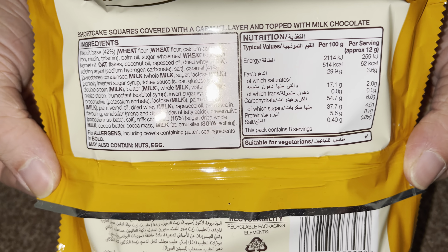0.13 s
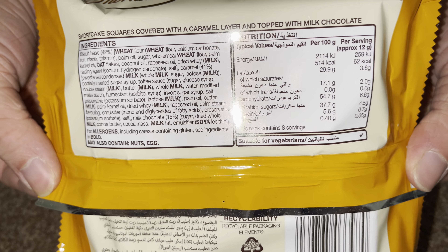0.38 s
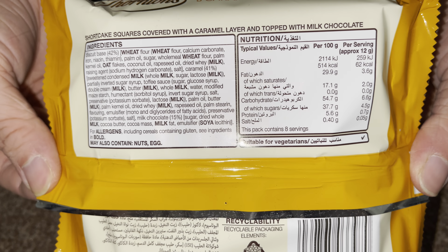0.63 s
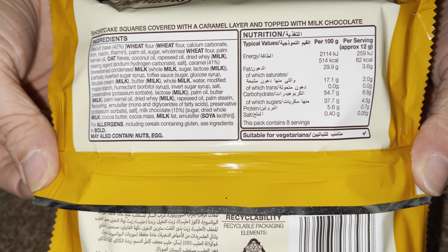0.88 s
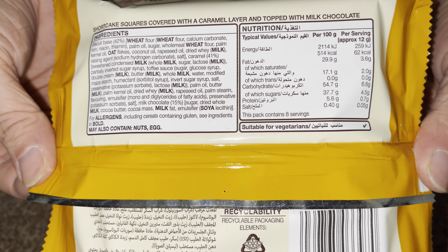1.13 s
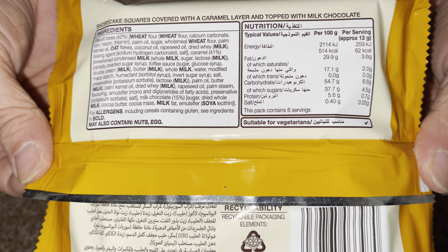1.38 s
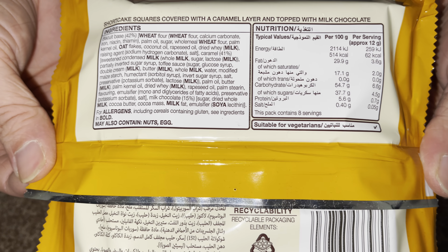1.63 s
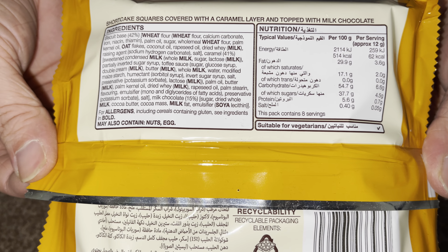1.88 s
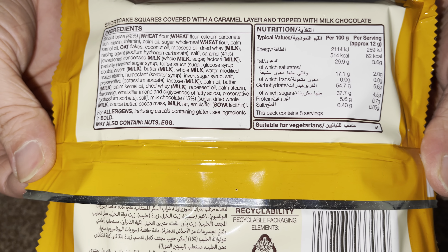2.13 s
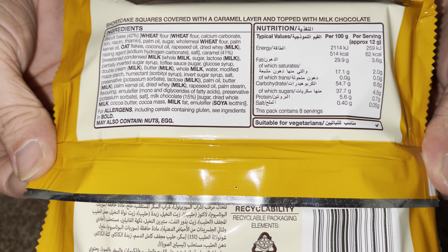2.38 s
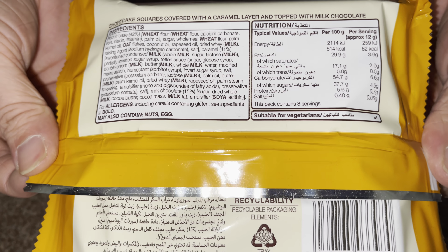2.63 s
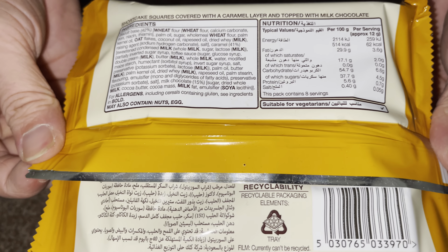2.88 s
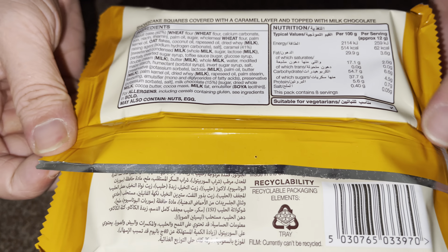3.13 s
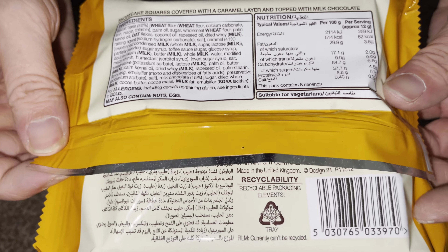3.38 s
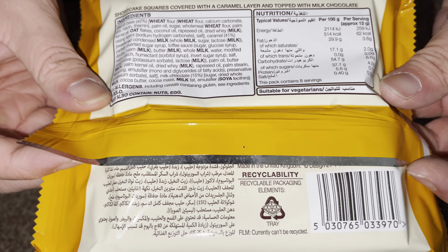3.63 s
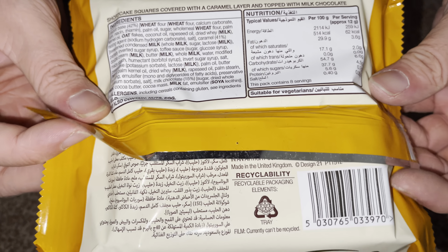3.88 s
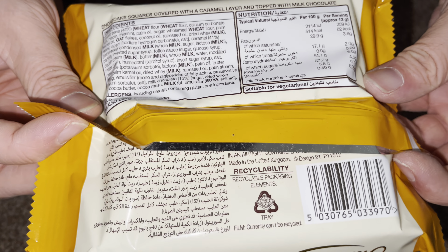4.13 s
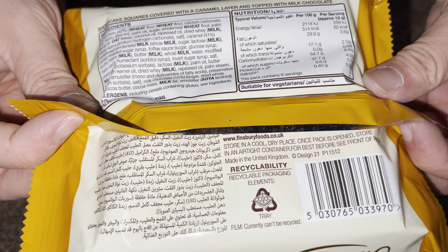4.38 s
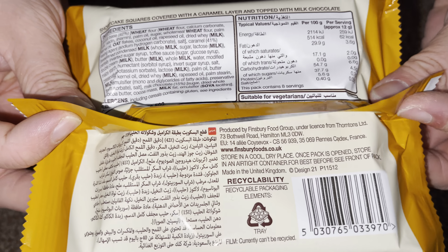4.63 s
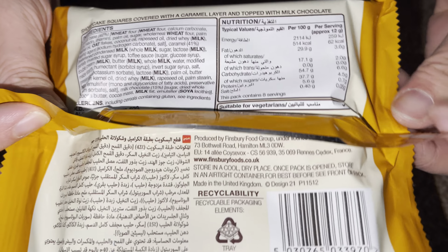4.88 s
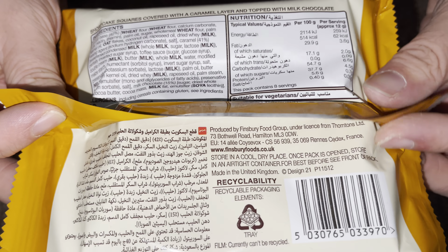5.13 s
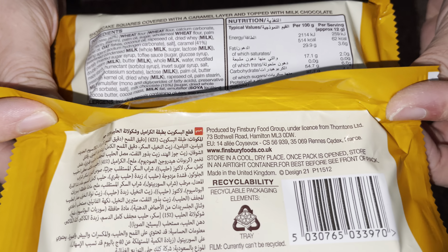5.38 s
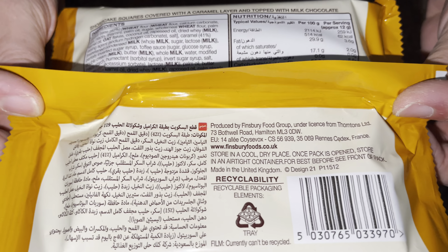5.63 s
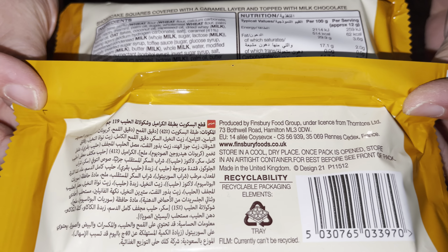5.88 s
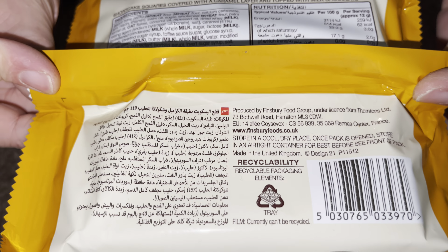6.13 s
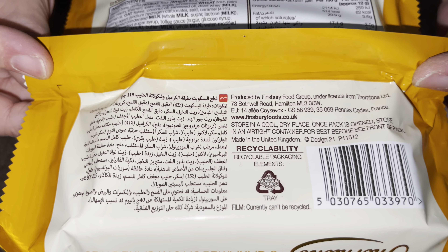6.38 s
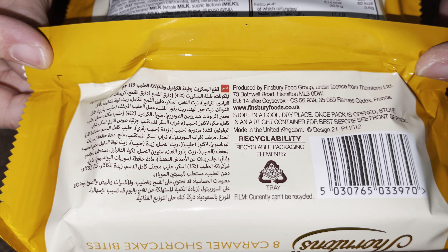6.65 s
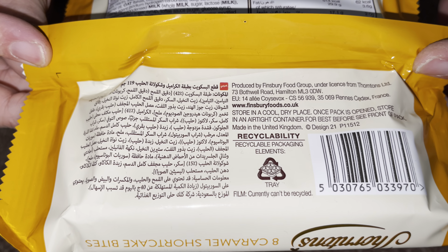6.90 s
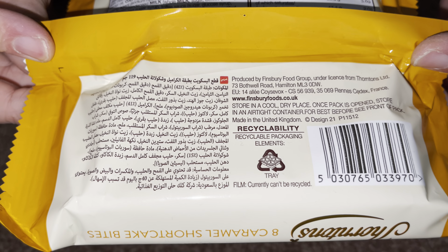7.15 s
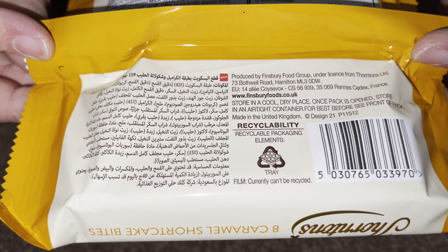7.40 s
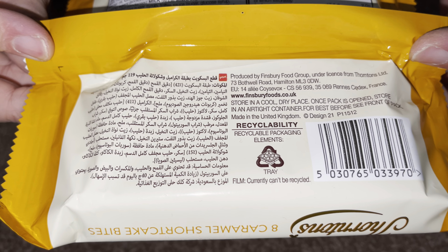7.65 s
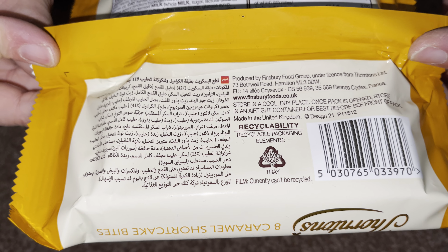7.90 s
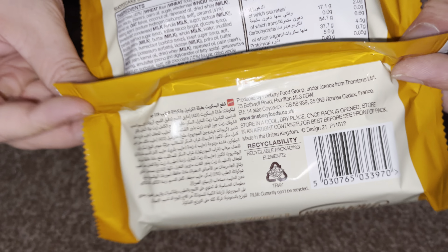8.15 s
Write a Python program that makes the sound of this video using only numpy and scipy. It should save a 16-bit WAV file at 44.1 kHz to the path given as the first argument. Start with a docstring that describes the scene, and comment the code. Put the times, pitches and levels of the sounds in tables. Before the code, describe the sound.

A thin plastic wrapper is handled very close to a stereo phone in a quiet carpeted room, with faint low traffic through the walls and steady microphone hiss. From 0 to 0.9 s scattered crisp snaps and light crackle sound, then two isolated clicks near 1.2 and 1.3 s. Near quiet follows, with only tiny ticks, until about 2.8 s. From 2.9 to 6.1 s the film is bent and pulled hard: dense, irregular bright crackle, sharp pops, short hollow pack resonances and soft low flexing, strongest around 4.5 to 5.2 s. It thins out by 6.2 s, leaving sparse ticks, a clearer one near 7.1 s. Meanwhile a distant car swells, nearest around 7.3 s, its soft low engine rising in pitch until about 7.5 s, then fading. A sharp snap at 7.9 s opens a last crackling burst, running to the end near 8.3 s. The room tail is short and dry.

```python
"""Far traffic rumbles through the walls of a carpeted room under steady microphone hiss, all shaped noise.
Close to a phone, two hands bend and pull a thin plastic snack wrapper: scattered snaps, then a dense bout, then a last one.
Each crease snaps over as bursts of noise, treble first, then the pack booms; fine crackle and low flexing fill in.
Between the last two bouts a far car swells and fades: its engine, made of sine waves, climbs in pitch."""
import sys
import numpy as np
from scipy import signal
from scipy.fft import rfft, irfft, next_fast_len
from scipy.io import wavfile
from scipy.ndimage import uniform_filter1d, map_coordinates

SR = 44100
rng = np.random.default_rng(int(sys.argv[2]) if len(sys.argv) > 2 else 0)


def dump(signal):
    """Clip the signal to [-1, 1] and save it as 16-bit WAV at the path in sys.argv[1]."""
    limited = np.clip(np.atleast_2d(signal).T, -1, 1)
    pcm = np.round(limited * 32767).astype(np.int16)
    wavfile.write(sys.argv[1], SR, pcm)


def decibels_to_gain(level_db):
    """Convert a level in decibels to a linear amplitude gain (20 dB per decade)."""
    exponent = np.asarray(level_db, float) / 20
    return 10 ** exponent


N = 364707  # length in samples

# Colour of the low rumble. Each row: frequency in Hz, relative level in dB per Hz.
RUMBLE_COLOUR = [(15, -40.5), (25, -10), (86, -4.5), (113, -14.5), (194, -34.5), (236, -34), (300, -46),
                 (390, -75.5), (660, -120)]
# Colour of the far road. Each row: frequency in Hz, relative level in dB per Hz.
ROAD_COLOUR = [(65, -24.5), (120, -1.5), (220, -8.5), (370, -17.5), (600, -29.5), (1500, -48.5),
               (3000, -120)]
# How alike low background sound is on both sides. Each row: frequency in Hz, likeness (1 = the same).
LIKENESS = [(40, 1), (130, 0.64), (300, 0.12), (700, 0.1)]


def unit(x):
    """Scales a sound to rms 1."""
    return x / np.sqrt(np.mean(x ** 2) + 1e-20)


def along(points, hz):
    """Reads a curve of (Hz, value) points on a log frequency axis."""
    point_hz, value = np.transpose(points)
    return np.interp(np.log(hz + 1), np.log(point_hz + 1), value)


def wobble(rate):
    """A smooth random curve with the given number of random knots a second."""
    knots = rng.standard_normal(int(N * rate / SR) + 4)
    return map_coordinates(knots, [np.arange(N) * rate / SR])


def filtered(x, response):
    """Multiplies the spectrum of x by a response, real or complex, at each frequency."""
    m = next_fast_len(N + 8192)  # spare room keeps the end from wrapping onto the start
    hz = np.fft.rfftfreq(m, 1 / SR)
    return irfft(rfft(x, m) * response(hz), m)[..., :N]


def rush(colour, alike):
    """Stereo noise of rms 1 with the given colour; its sides agree as much as alike says at each frequency."""
    def mid_side(hz):
        turn = np.arccos(np.clip(along(alike, hz), -1, 1)) / 2
        return decibels_to_gain(along(colour, hz)) * [np.cos(turn), np.sin(turn)]

    mid, side = filtered(rng.standard_normal((2, N)), mid_side)
    return unit(np.array([mid + side, mid - side]))


def traffic(car):
    """Low rumble and road noise swell unevenly; they never stop and grow as the far car comes near."""
    # levels before the unevenness and the left-right lean
    rumble_db, road_db = -67, -79  # steady traffic
    car_rumble_db, car_road_db = -69.5, -72.5  # amount added with the car at its nearest
    rumble_level = (decibels_to_gain(rumble_db) + decibels_to_gain(car_rumble_db) * car) * decibels_to_gain(3.7 * wobble(4.8))
    road_level = (decibels_to_gain(road_db) + decibels_to_gain(car_road_db) * car) * decibels_to_gain(2.0 * wobble(7.7))
    return rumble_level * rush(RUMBLE_COLOUR, LIKENESS) + road_level * rush(ROAD_COLOUR, LIKENESS)


def hiss():
    """The microphone's own steady noise, almost unrelated on the two sides."""
    # Colour of the self-noise. Each row: frequency in Hz, relative level in dB per Hz.
    hiss_colour = [(150, -44), (250, 2), (421, -6), (476, -9), (566, -6), (4050, -19), (5830, -17.5),
                   (9010, -21.5), (10900, -17), (16000, -33.5)]
    return decibels_to_gain(-79.5) * rush(hiss_colour, [(1000, 0.0018)])


def snaps():
    """Each snap is a burst in every band of the film; slow bending waves make the lows swell later and last longer."""
    # Creases snapping over. Each row: time in seconds, middle peak in dB, treble in dB above the middle,
    # boom in dB above the middle, boom pitch in Hz.
    creases = [(0.0094, -30, -24, -7, 1630), (0.0393, -39.5, -47, -7, 1140),
               (0.1341, -64.5, -25, 1.5, 1480), (0.3014, -39, -6.5, -14, 1550),
               (0.3435, -47.5, -14, -10.5, 250), (0.3617, -40, -25, -12, 1480),
               (0.39, -28, -2.5, -11.5, 392), (0.41, -33, -15, -8, 740), (0.5092, -32, -4, -5.5, 1400),
               (0.5227, -31, -12, -14.5, 272), (0.597, -40, -19, 1, 650), (0.7136, -25.5, 0.5, -41, 1570),
               (0.7711, -44, -13.5, -12, 724), (0.9247, -52.5, -31, -6.5, 1206),
               (1.1927, -32, -34.5, -20.5, 875), (1.3201, -23.5, -23.5, -21, 870),
               (1.8738, -67.5, -0.5, -13.5, 276), (1.923, -66, -27, 19, 557), (2.04, -56, -7, -30.5, 249),
               (2.26, -52, -6, -30.5, 250), (2.769, -62, 5, -24, 250), (2.7896, -63, -12, 2, 750),
               (2.82, -35.5, -58, -14, 361), (2.8834, -53, -33, -7.5, 686), (2.9141, -47, -9, 0, 619),
               (2.9635, -17.5, -17, -22.5, 275), (2.989, -24.5, -11, -11, 692),
               (3.0015, -27, -26, -14, 290), (3.1032, -24.5, -12.5, -33, 1560), (3.1148, -34, 3, -4.5, 716),
               (3.1714, -11.5, -12, -33, 1600), (3.187, -25, -10, -1.5, 800), (3.1974, -24.5, 0, -26, 821),
               (3.2113, -35, -1.5, 0, 720), (3.2449, -17, -2, -17, 287), (3.2853, -29.5, -8, -14, 611),
               (3.2996, -18.5, -24, -14, 790), (3.3479, -21, -0.5, -11.5, 670), (3.3615, -28, -9, -10, 363),
               (3.3773, -25.5, -6, -20, 264), (3.4104, -17, 0.5, -8, 1510), (3.4211, -23, 1.5, -18, 266),
               (3.451, -34, -3.5, -5.5, 670), (3.4702, -40, 0, 3, 794), (3.5018, -26, -3, -14.5, 640),
               (3.5161, -25, 0, -22, 684), (3.534, -26.5, 3, -13.5, 676), (3.5527, -26, 3, -11, 770),
               (3.5814, -25, -4.5, -18.5, 1580), (3.6415, -33.5, -4, -2, 670), (3.6584, -33, -3, -32, 689),
               (3.7, -26.5, -3.5, -5.5, 1500), (3.7344, -22, 3, -14.5, 300), (3.7557, -26.5, -6, -9.5, 850),
               (3.79, -25.5, 3.5, -15, 1600), (3.8062, -21.5, 3.5, -10, 870), (3.8144, -23.5, -8, -16, 721),
               (3.8247, -15, -9.5, -19.5, 1360), (3.883, -24, -3, -17, 1190), (3.8953, -30.5, -9, -14, 695),
               (3.9141, -32, -2, -3, 490), (3.9257, -31, -13, -18, 355), (3.9683, -26, -7, -11.5, 835),
               (4.0706, -19, -5, -15.5, 285), (4.142, -24, -6, -47, 791), (4.1738, -25.5, 9, -17, 778),
               (4.1938, -29, 7.5, -31, 557), (4.2016, -21, -0.5, -16, 899), (4.242, -31.5, -1, -6, 293),
               (4.2682, -26.5, 3, -14, 1180), (4.287, -25, -2, -19, 746), (4.3078, -27.5, -5.5, -11.5, 297),
               (4.4007, -29.5, -19.5, -7, 704), (4.4455, -33, 1.5, -15, 272), (4.4642, -32, 4.5, -5, 253),
               (4.476, -13, 1.5, -12, 714), (4.5155, -23.5, -1, -9, 640), (4.5437, -9, -18, -26.5, 686),
               (4.576, -23.5, -9, -38, 684), (4.6351, -16, -6, -26, 840), (4.6922, -32, 1.5, -3.5, 730),
               (4.7178, -10.5, 1, -16, 845), (4.7236, -15, -5, -10, 411), (4.7294, -20, -3, -10.5, 320.6),
               (4.7676, -23.5, -4, -20.5, 837), (4.778, -22.5, -5, -9.5, 745), (4.804, -32, 1.5, -1.5, 800),
               (4.8188, -29.5, -6.5, -6.5, 708), (4.8375, -30, -6, -22, 288), (4.896, -35, -1.5, -0.5, 374),
               (4.9114, -28.5, 0, -1, 727), (4.927, -19, -1.5, -18, 1520), (4.9344, -24.5, -7.5, -25, 1460),
               (4.955, -24.5, -19.5, -15, 654), (5.0319, -23.5, -14, -21.5, 670),
               (5.0481, -35, 5, -5.5, 579), (5.0605, -9.5, -9.5, -22, 1550),
               (5.0676, -15.5, -7, -13.5, 1400), (5.0721, -18, -1, -25, 678),
               (5.1096, -13, -2.5, -21.5, 815), (5.17, -15, -7.5, -17.5, 740),
               (5.2325, -31.5, -20, -1.5, 780), (5.2516, -31, -9.5, -7, 314), (5.2808, -32.5, -8, -33, 767),
               (5.2939, -22, 3, -62, 1490), (5.337, -29.5, -16, -7.5, 972),
               (5.3639, -26.5, -1.5, -10.5, 760), (5.4156, -17.5, 1, -14.5, 304),
               (5.4702, -25.5, -5.5, -21.5, 660), (5.4938, -49.5, -9, 14, 773),
               (5.5052, -34, 0.5, -2.5, 872), (5.5172, -29, -17, -15.5, 708),
               (5.5966, -31, -10.5, -15, 657), (5.6208, -25, -3, -18, 1480), (5.6274, -27, 3, -7, 248),
               (5.6395, -20.5, 6.5, -8.5, 308), (5.6547, -28, -5.5, -9.5, 340),
               (5.672, -27.5, 1, -8.5, 896), (5.7008, -25.5, 5.5, -23, 902),
               (5.7463, -28.5, -8, -17.5, 1380), (5.8364, -27.5, -16, -17.5, 312),
               (5.9163, -30, -28, -17.5, 654), (5.9803, -43, -9, -4, 853), (6.0006, -22.5, -7, -19.5, 908),
               (6.018, -29.5, -13, -5, 813), (6.0352, -36.5, -7.5, -3.5, 673),
               (6.0597, -24, -9, -13.5, 340), (6.0952, -35, -15.5, -6.5, 842), (6.2302, -70, 11, 1.5, 882),
               (6.4058, -53, -7, -7.5, 370), (6.43, -69, 11, -11.5, 291), (6.5321, -49.5, -15.5, -9, 404),
               (6.6813, -63, -0.5, 0.5, 292), (6.9298, -38.5, -26.5, -6, 807),
               (6.9667, -40.5, -31, -17, 887), (7.097, -30, -17, -12, 720),
               (7.6123, -42.5, -27, -40.5, 888), (7.7936, -67, 17.5, -10, 255),
               (7.8518, -63.5, -17, 12, 715), (7.9175, -38.5, -32, -33, 250), (7.934, -17, -23, -57, 1310),
               (8.0046, -42.5, -30, -3.5, 312), (8.0539, -41.5, -5, -2, 840),
               (8.0653, -27.5, -19, -16, 1380), (8.0894, -44, -8, -2.5, 770),
               (8.1316, -24, -14.5, -20, 710), (8.2102, -33, 5.5, -9, 720), (8.239, -37.5, 8, -10, 840),
               (8.2524, -31.5, 8.5, -6, 759)]
    # Bands of one snap. Each row: low edge in Hz, high edge in Hz, rise in ms, time to fall by 60 dB in ms,
    # level in dB, left-right lean in dB.
    film_bands = [(140, 350, 3.4, 39, -5, 5), (425, 862, 1, 44, -1, 7), (1081, 2220, 0.2, 28, -5.5, 2),
                  (2680, 4750, 0.34, 10, -3.5, 3.5), (5020, 7450, 0.42, 11, -2, 0),
                  (8540, 11000, 0.067, 3.1, -4.5, -9), (11600, 16500, 0.1, 6.27, -4, -13.5)]
    # Notes at which the pack rings. Each row: frequency in Hz, level in dB.
    pack_modes = [(280, -1.5), (340, -2.5), (570, -1.5), (680, 2.5), (760, 1.5), (860, 2.5), (1400, 0.5)]
    shared = 0.86  # part of the noise that both sides have in common
    snap_ms = 1.54  # a snap holds the energy of its peak kept up this long
    ring_db, ring_turns = -3, 11  # ringing beside the boom level; cycles to fall by 60 dB
    fall_db_per_octave = 35.5  # a snap drives the modes near its boom pitch

    s, peak_db, treble_db, boom_db, boom_hz = np.transpose(creases)
    middle_db = peak_db + 10 * np.log10(snap_ms * SR / 1000)
    # left lag: below zero the left is early, as most creases lie nearer the left port
    lag_ms = -.17 + .13 * rng.standard_normal(len(s))
    t_ms = np.arange(1536) / SR * 1000 - 9  # starts ahead of the snap
    after = t_ms.clip(0)
    # faint noise that swells just before each snap and dies away after it
    lead_in = decibels_to_gain(-22.5) * np.exp(-np.abs(t_ms) / 2.5)
    out = np.zeros((2, N + 2 * len(t_ms)))

    def add(ear, sign, burst, db, lean_db):
        """Lays bursts of the given energy into one side; the port reached first also hears more."""
        gain = decibels_to_gain(db + sign * (lean_db - 6 * lag_ms) / 2) / np.linalg.norm(burst, axis=1)
        seconds = s[:, None] + (t_ms + sign * lag_ms[:, None] / 2) / 1000
        where = np.round(seconds * SR).astype(int)
        values = burst * gain[:, None] * (where >= 0)
        out[ear] += np.bincount(where.ravel().clip(0), values.ravel(), out.shape[1])

    # the pack rings
    mode_hz, mode_db = np.transpose(pack_modes)
    turns = mode_hz[:, None] * after / 1000
    modes = np.sin(2 * np.pi * turns) * (1 - np.exp(-turns ** 2)) * decibels_to_gain(-60 * turns / ring_turns)
    octaves_away = np.abs(np.log2(boom_hz[:, None] / mode_hz))
    ring = decibels_to_gain(mode_db - fall_db_per_octave * octaves_away) @ modes
    add(0, 1, ring, middle_db + boom_db + ring_db, lean_db=10)
    add(1, -1, ring, middle_db + boom_db + ring_db, lean_db=-0.5)

    # the film bursts into noise, band by band
    for low_hz, high_hz, rise_ms, t60_ms, db, lean_db in film_bands:
        shape = lead_in + (1 - np.exp(-(after / rise_ms) ** 2)) * decibels_to_gain(-60 * after / t60_ms)
        both, left, right = rng.standard_normal((3, len(s), len(t_ms)))
        band = signal.butter(2, [low_hz, high_hz], "bandpass", fs=SR, output="sos")
        centre = np.log(low_hz * high_hz) / 2
        corners = np.log([600, 2400, 8000])  # Hz of boom, middle and treble
        colour_db = [np.interp(centre, corners, row) for row in zip(boom_db, 0 * s, treble_db)]
        for ear, own, sign in ((0, left, 0.73), (1, right, -1)):
            noise = shared * both + np.sqrt(1 - shared ** 2) * own
            burst = signal.sosfilt(band, noise * shape)
            add(ear, sign, burst, middle_db + colour_db + db, lean_db)
    return out[:, :N]


def room(x):
    """A soft, furnished room hears the film from all sides: its smoothed power feeds a diffuse, dying tail."""
    # How long the room rings. Each row: frequency in Hz, time to fall by 60 dB in seconds.
    ring_times = [(200, 0.083), (600, 0.21), (3500, 0.21), (6000, .22), (10000, 0.076)]
    onset_ms = 4
    hz, t, z = signal.stft(x, SR, nperseg=128)
    power = uniform_filter1d(np.abs(z) ** 2, size=3, axis=0)
    t = t[:256]
    fade = (1 - np.exp(-(t * 1000 / onset_ms) ** 2)) * decibels_to_gain(-60 * t / along(ring_times, hz)[:, None]) ** 2
    fade = fade / fade.sum(axis=1, keepdims=True)
    tail = signal.fftconvolve(power, fade, axes=1)[:, :z.shape[1]]
    noise = rush([(1000, 0)], [(250, 1.0), (1500, .1)])
    diffuse = signal.stft(noise, SR, nperseg=128)[2]
    answer = diffuse / np.abs(diffuse).mean() * np.sqrt(np.abs(tail))
    return signal.istft(answer, SR, nperseg=128)[1][:, :N]


def shaking():
    """The harder the hands work, the more a low uneven shudder reaches the microphone."""
    full_db, grows = -55, 0.46  # rumble part at full effort before the wobble; dB per dB of effort
    work_db = effort()
    level_db = full_db + grows * (work_db - work_db.max()) + 3.6 * wobble(7)
    return decibels_to_gain(level_db) * (rush(RUMBLE_COLOUR, LIKENESS) + decibels_to_gain(-4) * rush(ROAD_COLOUR, LIKENESS))


def effort():
    """How hard the hands work the film, as the level of fine crackle in dB; almost none between bouts."""
    # One table for each bout of handling. Each row: time in seconds, fine crackle level in dB.
    bouts = [
        [(.3, -68), (.48, -70), (.6, -66.5), (.85, -85)],
        [(2.75, -75), (2.97, -55), (3.35, -48.5), (3.55, -53), (4.3, -45), (4.53, -51), (4.9, -41), (5.05, -47),
         (5.58, -57), (5.69, -45), (5.92, -60.5), (6.2, -79.5)],
        [(7.8, -99.5), (7.95, -71), (8.1, -45.5), (8.27, -48.5)],
    ]
    t = np.arange(N) / SR
    levels = []
    for rows in bouts:
        s, db = np.transpose(rows)
        levels.append(np.interp(t, s, db, left=-120, right=-120))
    return np.max(levels, axis=0)


def crackle(per_second, spread_db, life_ms):
    """Countless small creases: clumped ticks of very unequal size, from either hand, each a dying puff of noise."""
    chance = per_second / SR * decibels_to_gain(5.6 * wobble(25))  # the wobble clumps the ticks
    sizes = decibels_to_gain(spread_db * rng.exponential(size=(2, N)).clip(0, 4))
    ticks = (rng.random((2, N)) < chance) * sizes
    life = decibels_to_gain(-60 * np.arange(2048) / SR * 1000 / life_ms)
    loudness = signal.fftconvolve(ticks, life[None], axes=1)[:, :N]
    left_hand, right_hand = loudness * rng.standard_normal((2, N))
    lag = round(.27 * SR / 1000)  # .27 ms, in samples
    late_left_hand = 0.21 * np.roll(left_hand, lag)  # the left hand is nearer the left port
    return np.array([left_hand + right_hand, late_left_hand + right_hand])


def handling():
    """Working the film sets off fine crackle and soft low flexing of the pack."""
    # Colour of the small creases. Each row: frequency in Hz, relative level in dB per Hz.
    crease_colour = [(500, -28.5), (1000, -6.5), (1900, -5), (2800, -4.5), (8000, -11), (16000, -7.5)]
    # Colour of the pack bending. Each row: frequency in Hz, relative level in dB per Hz.
    flex_colour = [(60, -33), (130, -18), (290, 5.5), (460, -12.5), (780, 7), (1400, -16.5), (2600, -27.5),
                   (4000, -120)]
    ticks = crackle(per_second=240, spread_db=5.5, life_ms=8)
    bumps = crackle(per_second=35, spread_db=3.5, life_ms=18)
    fine = filtered(ticks, lambda hz: decibels_to_gain(along(crease_colour, hz)))
    flex = filtered(bumps, lambda hz: decibels_to_gain(along(flex_colour, hz)))
    flex_db = -4.5 + np.array([[2.2], [-2.2]])  # beside the crackle, left and right
    return decibels_to_gain(effort()) * (unit(fine) + decibels_to_gain(flex_db) * unit(flex))


def passing_car():
    """Nearness of one far car, 1 at its nearest: it swells and fades along a bell-shaped curve."""
    nearest_s, comes_s, goes_s = 7.26, 0.98, 0.78  # nearest moment; time to swell and to fade by 6 dB
    t = np.arange(N) / SR
    return decibels_to_gain(-6 * ((t - nearest_s) / np.where(t < nearest_s, comes_s, goes_s)) ** 2)


def tyres(car):
    """The car's tyres are an uneven rush of noise, strongest near 900 Hz."""
    tread = [(450, -18.5), (900, 6.0), (1150, -6.0), (1800, -16.5), (4000, -47.5)]  # (Hz, dB per Hz)
    return decibels_to_gain(-76 + 4 * wobble(2.4)) * car * rush(tread, LIKENESS)


def engine():
    """The car's engine pulls away: a few slightly unsteady sine waves climb in pitch and come through the wall."""
    # Tones of the engine. Each row: multiple of the firing pitch, level in dB before wobble, wall and lean.
    orders = [(1, -65), (2, -71), (3, -77)]
    start_s, length_s, fade_s = 6.2, 1.3, .1
    start_hz, climb_hz_per_s, top_hz = 54.5, 21, 76  # firing pitch, its climb, where it levels off
    wall_hz, wall_width_hz, wall_db = 58, 3, 11  # the wall booms when the engine passes its pitch
    t = np.arange(N) / SR - start_s
    hz = np.clip(start_hz + climb_hz_per_s * t, 0, top_hz) + .5 * wobble(6)
    heard = np.clip(np.minimum(t, length_s - t) / fade_s, 0, 1)
    turn = 2 * np.pi * np.cumsum(hz) / SR
    out = np.zeros(N)
    for k, db in orders:
        boom = 1 + decibels_to_gain(wall_db) / (1 + ((k * hz - wall_hz) / wall_width_hz) ** 2)  # adds to the direct tone
        out += decibels_to_gain(db + 2 * wobble(4)) * boom * np.sin(k * turn)
    return heard * out


def background():
    """Traffic and the passing car, a little stronger on the left, over the microphone's hiss."""
    car = passing_car()
    lean = decibels_to_gain([[1.2], [-1.2]])
    return lean * (traffic(car) + tyres(car) + engine()) + hiss()


def scene():
    """The wrapper, the room's answer, the low shudder and the background."""
    wrapper = snaps() + handling()
    return wrapper + decibels_to_gain(-12) * room(wrapper.mean(axis=0)) + shaking() + background()


def band_limit(x):
    """A steep low-pass at the top of the band."""
    return signal.sosfilt(signal.butter(12, 17010, fs=SR, output="sos"), x)


def record(dry):
    """Above about 8400 Hz the phone feeds both sides from one port, the left a fixed part of a millisecond late."""
    # Level of the top band, which drops steeply above about 12.6 kHz. Each row: frequency in Hz, level in dB.
    top_response = [(8500, -1), (10300, 2.5), (11200, 2.5), (12000, -11), (12650, -13), (13200, -23.5),
                    (15600, -25.5), (16600, -34)]
    join_hz, turn_hz = 8400, 3700  # where one port takes over; each side's phase turns half a cycle per turn_hz

    def top(hz):
        return 1 / (1 + np.exp((join_hz - hz) / 200))

    def top_band(hz):
        late = np.exp(-1j * np.pi * (hz - join_hz) / turn_hz)
        return decibels_to_gain(along(top_response, hz)) * top(hz) * [late, 1 / late]

    def lower_bands(hz):
        return (1 - top(hz)) / (1 + (34 / (hz + 1)) ** 6)  # the deepest bass is cut

    x = filtered(dry, lower_bands) + filtered(dry[1], top_band)
    x = x / (1 + np.abs(x / .9) ** 6) ** (1 / 6)  # loud peaks saturate softly
    return band_limit(x)


dry = scene()
out = record(dry)
dump(out)
```